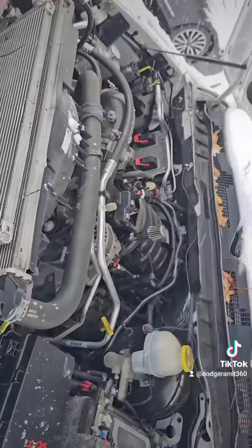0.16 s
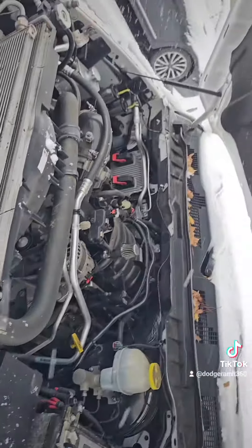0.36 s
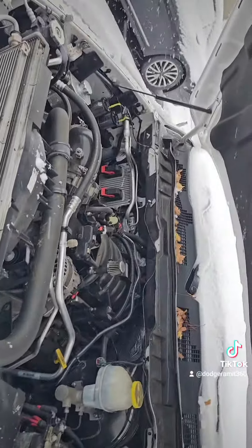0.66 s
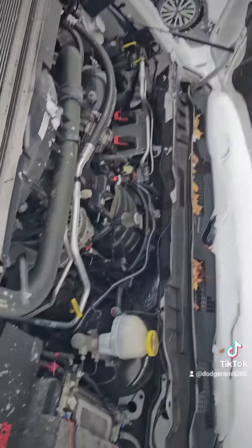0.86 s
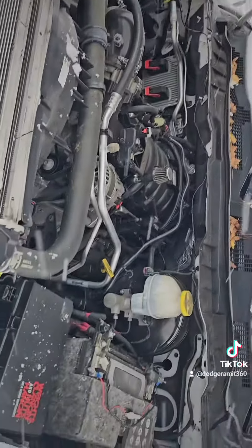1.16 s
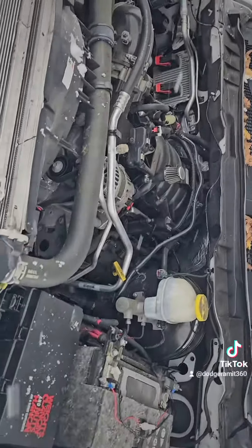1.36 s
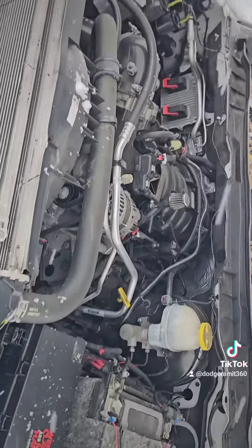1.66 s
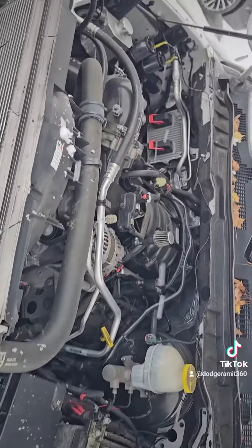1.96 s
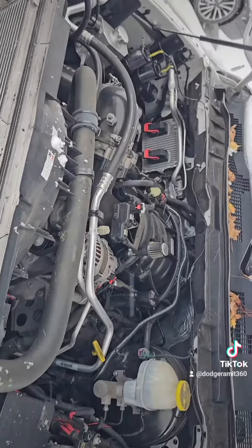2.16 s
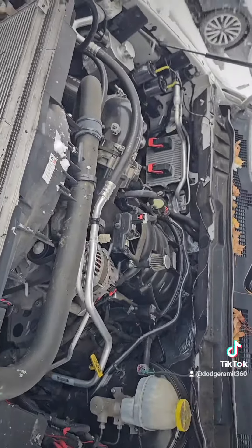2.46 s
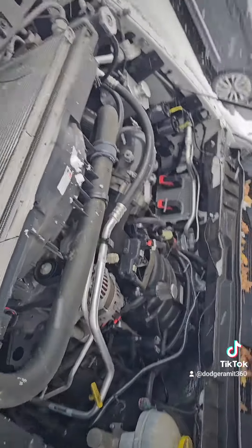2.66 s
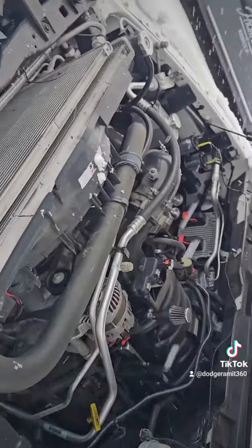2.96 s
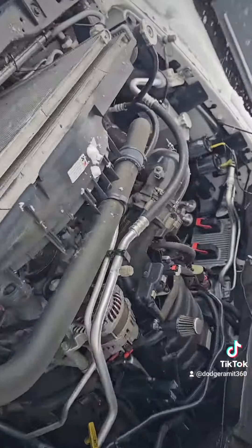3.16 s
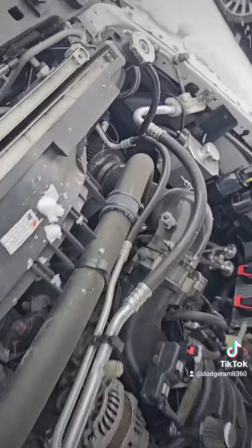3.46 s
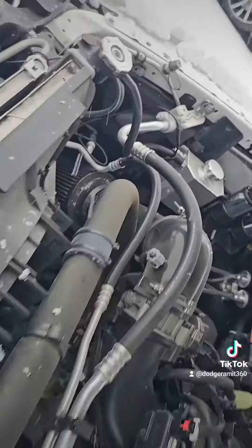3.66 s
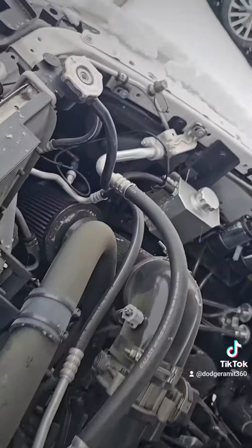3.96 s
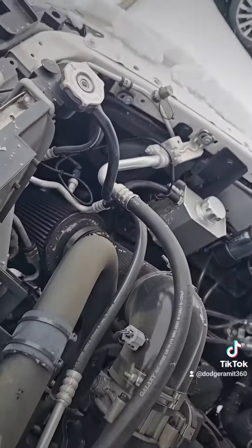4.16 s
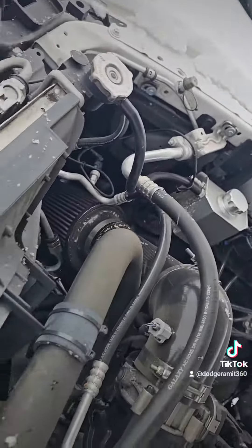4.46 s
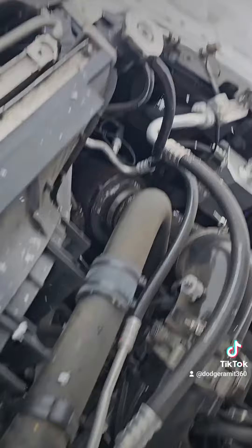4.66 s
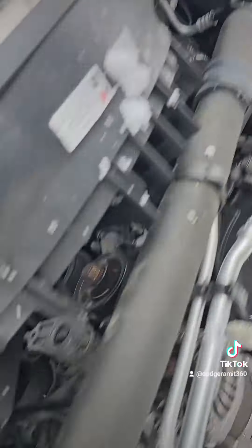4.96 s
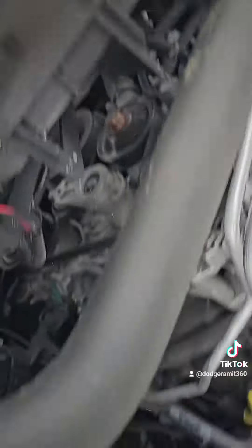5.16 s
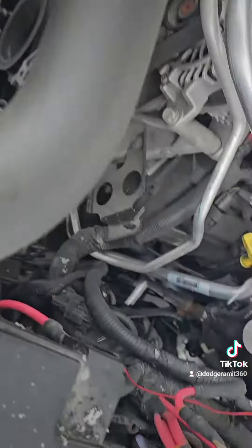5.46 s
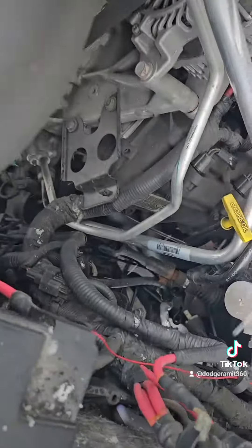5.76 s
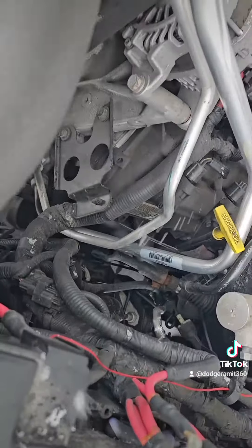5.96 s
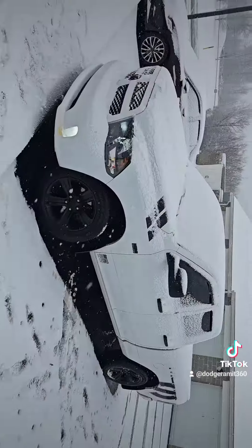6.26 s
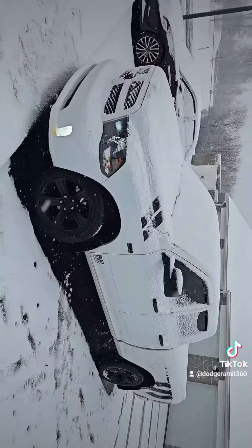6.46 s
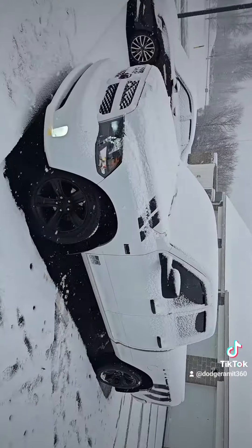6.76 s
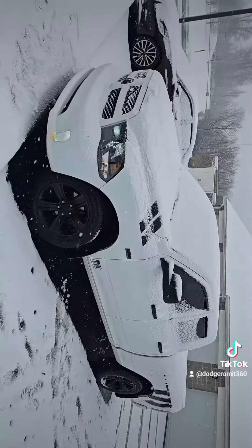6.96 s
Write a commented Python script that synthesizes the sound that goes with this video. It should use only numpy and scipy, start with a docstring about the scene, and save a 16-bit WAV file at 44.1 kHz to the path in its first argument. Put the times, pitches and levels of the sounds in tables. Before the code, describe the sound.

Close over an engine bay, a cold V8 throbs unevenly with ticking, hiss and wind bumps; after a short silence it sounds darker from outside.

```python
"""Over the open engine bay of a V8 pickup, cold and at fast idle on an open exhaust; a phone listens, then is lowered.
Eight evenly spaced firings send unequal blasts down unequal headers, ringing the exhaust resonances in a lope.
Gas hisses, the valve train clatters, a lifter clacks, injectors tick, accessories whine, wind nudges the microphone.
After a short silent break the same idle is heard from beside the truck, with the clatter and hiss dulled."""
import sys
import numpy as np
from scipy import signal
from scipy.fft import rfft, irfft
from scipy.io import wavfile
from scipy.ndimage import uniform_filter1d

SR = 44100
rng = np.random.default_rng(int(sys.argv[2]) if len(sys.argv) > 2 else 0)


def master_out(mix):
    """Clip the mix to full scale and print it as 16-bit PCM to the path in sys.argv[1]."""
    frames = np.transpose(np.atleast_2d(mix))
    ceiling = np.clip(frames, -1, 1)
    pcm = np.round(ceiling * 32767).astype(np.int16)
    wavfile.write(sys.argv[1], SR, pcm)


N = 313551
TIME = np.arange(N) / SR
FREQ = np.maximum(np.fft.rfftfreq(N, 1 / SR), 1)

# cylinders in firing order: (delay down the header [ms], relative exhaust blast [dB], relative hiss [dB])
CYLINDERS = [(-1.5, -4.2, -4.5), (-1.2, -2.9, -1), (-.1, 2.4, 1), (4.9, -2.2, -4), (-.7, -2.5, -.5),
             (-.4, -3.8, -4.5), (1.8, -.9, -3), (-1.5, 3.7, 1)]
# engine bay level as the microphone comes nearer, before each source's own trim: (time [s], level [dB])
BAY = [(0.4, -44.5), (1.33, -42.5), (3.06, -42.5), (3.42, -40.5), (4.33, -41), (6.0, -39), (6.05, -39)]
# the silence between the two listening places: (start [s], end [s])
BREAK_START_S, BREAK_END_S = (6.188, 6.285)


def undb(db):
    """Decibels to gain."""
    return 10 ** (np.asarray(db) / 20)


def curve(rows, column=1):
    """One column of a time table at every sample."""
    rows = np.array(rows)
    return np.interp(TIME, rows[:, 0], rows[:, column])


def over_freq(points):
    """A table of (frequency [Hz], value) at every frequency, straight over log frequency."""
    hz, value = np.transpose(points)
    return np.interp(np.log(FREQ), np.log(hz), value)


def unit(x):
    """Scale to a standard deviation of 1."""
    return x / np.std(x)


def noise():
    """White noise."""
    return rng.standard_normal(N)


def colour(x, points):
    """Give x a spectrum that falls 60 dB per octave further past the table's ends; rms 1."""
    octaves_below = np.log2(points[0][0] / FREQ)
    octaves_above = np.log2(FREQ / points[-1][0])
    octaves_out = np.maximum(0, np.maximum(octaves_below, octaves_above))
    gain = undb(over_freq(points) - 60 * octaves_out)
    return unit(irfft(rfft(x) * gain, N))


def resonance(hz, width_hz):
    """Response of one damped mode, gain 1 at its centre."""
    s = 1j * FREQ
    return s * width_hz / (s * s + s * width_hz + hz * hz)


def walk(rate_hz):
    """Straight lines between random normal values of spread 1, rate_hz of them a second."""
    steps = rng.standard_normal(4096)
    return np.interp(TIME * rate_hz, np.arange(len(steps)), steps)


def swell(centre_s, spread_s):
    """A Gaussian rise and fall with a peak of 1; spread_s is its standard deviation."""
    return np.exp(-.5 * ((TIME - centre_s) / spread_s) ** 2)


def impulses(times, sizes):
    """One impulse at each time."""
    return np.bincount(np.clip(times * SR, 0, N - 1).astype(int), sizes, N)


def crank(idle_rpm=824.82, sag_from_s=2.63, sag_rpm_per_s=2.1, second_start=.3425):
    """Four-stroke cycles so far, two turns each; the fast idle holds, then sinks as the engine warms."""
    # brief surges of the idle: (time [s], spread [s], extra speed [rpm])
    surges = [(1.908, .24, 5.94), (3.502, .196, 9.81)]
    rpm = idle_rpm - sag_rpm_per_s * np.maximum(TIME - sag_from_s, 0)
    for at_s, spread_s, extra_rpm in surges:
        rpm = rpm + extra_rpm * swell(at_s, spread_s)
    cycles = np.cumsum(rpm) / SR / 120
    # after the break the engine is at another point of its cycle
    through_break = np.clip((TIME - BREAK_START_S) / (BREAK_END_S - BREAK_START_S), 0, 1)
    return cycles - second_start * through_break


def firings(cycle, first=0.0698):
    """Time of every firing and its place in the firing order; eight evenly spaced in each cycle."""
    number = np.arange(int((cycle[-1] - first) * len(CYLINDERS)) + 1)
    times = np.interp(number / len(CYLINDERS) + first, cycle, TIME)
    return times, number % len(CYLINDERS)


def exhaust(cycle, close, beside, blast_db=36.0, low_cut_hz=40, soft_hz=430):
    """Unequal blasts, delayed unequally by the headers, ring the pipes; each listening place has its own mix."""
    # exhaust resonances, some in close pairs from the two banks: (frequency [Hz], width [Hz],
    # level over the bay [dB], level at the engine [dB], level beside the truck [dB], polarity [+1 or -1])
    pipes = [(49.8, 18.4, -9, -9.5, -17.5, -1), (69.8, 3.56, -4, -0.5, -7.5, -1),
             (100, 21.3, -2.5, 2.4, -16.5, -1), (111.73, 16.15, 2.5, 5, -11, 1),
             (139.4, 2.33, -4.5, -8.5, -22, 1), (151.8, 11.5, -46, -9, -6.5, 1),
             (186, 12.47, 7, 2.5, 1, -1), (189.7, 18.7, 2.3, -2.5, -4.5, 1),
             (233.9, 5.5, -10.5, -30, -20, -1), (254.2, 11.7, -21.5, -28.5, -16.5, -1),
             (296.8, 7.7, -13.5, -19.5, -24.5, 1), (343, 46, -35.5, -43.5, -31.5, 1)]
    # turbulence in the pipes: (frequency [Hz], relative level [dB per Hz])
    churn = [(40, -19), (70, 7), (200, 5), (290, 2), (400, -7.5), (600, -24)]
    scatter_db, jitter_ms, churn_db = .7, .12, -42
    times, cylinder = firings(cycle)
    delay_ms, size_db, _ = np.array(CYLINDERS)[cylinder].T
    time_chance, size_chance = rng.standard_normal((len(times), 2)).T
    arrival = times + (delay_ms + jitter_ms * time_chance) / 1000
    blasts = impulses(arrival, undb(blast_db + size_db + scatter_db * size_chance))
    # an open pipe radiates almost nothing of the slowest pulsation
    low_cut = signal.butter(4, low_cut_hz, "high", fs=SR, output="sos")
    blasts = rfft(signal.sosfilt(low_cut, blasts))
    # a blast lasts about a millisecond, so it holds no treble
    blasts = blasts / (1 + (FREQ / soft_hz) ** 8)
    out = undb(churn_db) * colour(noise(), churn)
    for hz, width_hz, bay_db, engine_db, beside_db, polarity in pipes:
        in_bay = undb(bay_db) * (1 - close) + undb(engine_db) * close
        gain = np.where(beside, undb(beside_db), in_bay)
        out = out + np.sign(polarity) * gain * irfft(blasts * resonance(hz, width_hz), N)
    return out


def valve_train(cycle, tick_s=0.011, valve_db=1, scatter_db=2.5, whirr_db=0, count=16):
    """Each valve seats once a cycle with its own short rattle, over the whirr of belt and fan."""
    ticks, age = 0, TIME[:SR // 40]
    for valve in range(count):
        place = (valve + rng.uniform(-.5, .5)) / count
        times = np.interp(np.arange(cycle[-1]) + place, cycle, TIME, left=-1, right=-1)
        times = times[times > 0]
        chance_db = scatter_db * rng.standard_normal(len(times))
        sizes = undb(valve_db * rng.standard_normal() + chance_db)
        rattle = rng.standard_normal(len(age)) * np.exp(-age / tick_s)
        ticks = ticks + signal.oaconvolve(impulses(times, sizes), rattle)[:N]
    return unit(ticks) + undb(whirr_db) * noise()


def lifter(cycle, place=0.5, ring_hz=1600, width_hz=900, db=-11):
    """One noisy lifter clacks once a cycle: a burst of noise rings a broad mode."""
    spread_cycles = .05
    gate = np.exp(-.5 * ((cycle % 1 - place) / spread_cycles) ** 2)
    clack = irfft(rfft(gate * noise()) * resonance(ring_hz, width_hz), N)
    return unit(clack) * undb(curve(BAY) + db)


def injectors(cycle, ring_hz=4240, width_hz=170, upper_hz=5300, upper_db=-6, lag_s=0.00076, db=-9.0):
    """A tick at every firing rings two short metal modes."""
    scatter_db, bounce_s = 1.2, .008
    times, _ = firings(cycle)
    sizes = undb(scatter_db * rng.standard_normal(len(times)))
    modes = resonance(ring_hz, width_hz) + undb(upper_db) * resonance(upper_hz, width_hz)
    # the needle bounces for a moment, differently each time
    window = np.hanning(int(bounce_s * SR))
    bounce = signal.fftconvolve(impulses(times + lag_s, sizes), window)[:N] * noise()
    return unit(irfft(rfft(bounce) * modes, N)) * undb(curve(BAY) + db)


def machinery(cycle, close, beside, above_db=-0.9, close_db=-0.88, beside_db=-49.5):
    """The clatter coloured by block and bay, with lifter and injectors; from beside, the body dulls it."""
    # clatter from above, close by and beside the truck: (frequency [Hz], relative level [dB per Hz])
    block_above = [(190, -47), (330, 5), (351, 0.5), (376, -6), (412, -23.5), (438, -17), (480, -11),
                   (726, -11), (854, -9.5), (1170, -9), (1770, -12), (1940, -7.5), (2870, -8.5),
                   (3280, -15.5), (3700, -12.5), (4810, -29), (8140, -120)]
    block_close = [(190, -38), (330, -2.5), (376, -12.5), (408, -8), (553, -3), (650, -5.5), (795, -4.5),
                   (1280, -10), (1960, -8), (2210, -10), (2400, -5), (2790, -9.5), (3700, -11.5),
                   (4810, -42), (8140, -120)]
    past_body = [(380, -1), (520, -10.5), (680, -9), (900, -9.5), (1500, -11.5), (2500, -12.5), (3300, -20),
                 (5200, -17.5), (6200, -25.5), (8400, -27), (10000, -44)]
    clatter = valve_train(cycle)
    from_above = (1 - close) * undb(above_db) * colour(clatter, block_above)
    from_close = close * undb(close_db) * colour(clatter, block_close)
    in_bay = undb(curve(BAY)) * (from_above + from_close) + lifter(cycle) + injectors(cycle)
    return np.where(beside, undb(beside_db) * colour(clatter, past_body), in_bay)


def puffs(cycle, lead_s=0.0027, rise_s=0.0029):
    """Gas flow that swells, spits and dies once a firing, each cylinder with its own strength; rms 1."""
    scatter_db, spit_db = .8, 2.1
    times, cylinder = firings(cycle)
    sizes = undb(np.array(CYLINDERS)[cylinder, 2] + scatter_db * rng.standard_normal(len(times)))
    age = TIME[:SR // 20] / rise_s
    flow = signal.fftconvolve(impulses(times - lead_s, sizes), age ** 2 * np.exp(-age))[:N]
    flow = flow * undb(spit_db * walk(450))
    return flow / np.sqrt(np.mean(flow ** 2))


def gas(flow, beside, hiss_steady=1.1, sizzle_steady=0.29, hiss_db=-2, sizzle_db=1.86, shielded_db=-25):
    """Hiss and sizzle follow the puffs; the highest band pulses most deeply; the body shields both from the side."""
    # gas hiss and its top sizzle: (frequency [Hz], relative level [dB per Hz])
    hiss_spectrum = [(2000, -28), (3400, -10.5), (4240, 2.5), (4730, -3), (5400, -3), (6190, -7),
                     (8060, -7), (8410, -8), (9160, -18.5), (10500, -29.5), (13600, -62), (22000, -120)]
    sizzle_spectrum = [(6060, -56), (10300, -36.5), (10800, -16), (12600, 1), (13900, 4), (15100, 2),
                       (16000, -18)]
    # sizzle level before its trim: (time [s], level [dB])
    sizzle_level = [(0.4, -52), (1.78, -49.5), (3.04, -48.5), (3.41, -43.5), (4.11, -47.5), (4.87, -45),
                    (5.96, -49), (6.05, -48.5)]
    hiss = colour(noise() * (hiss_steady + flow), hiss_spectrum) * undb(curve(BAY) + hiss_db)
    sizzle = colour(noise() * (sizzle_steady + flow), sizzle_spectrum)
    sizzle = sizzle * undb(curve(sizzle_level) + sizzle_db)
    return (hiss + sizzle) * undb(shielded_db * beside)


def passing_bands(rows, drive, fade_s=0.078):
    """Resonant bands, each fed by noise times the drive, that fade in and out."""
    out = 0
    for hz, width_hz, db, start, end in rows:
        heard = np.clip(np.minimum(TIME - start, end - TIME) / fade_s + .5, 0, 1)
        # two passes, each twice the listed width
        band = irfft(rfft(drive * noise()) * resonance(hz, 2 * width_hz) ** 2, N)
        out = out + undb(db) * heard * unit(band)
    return out


def whines(flow, rasp_steady=1.9):
    """Narrow wavering tones of the accessories come and go; the broader rasps pulse with the firings."""
    # accessory whines, then rasps that open up as the microphone moves past:
    # (frequency [Hz], nominal width [Hz], level [dB], start [s], end [s])
    whine_bands = [(835, 50, -57, 0, 3.3), (1000, 4, -63, 1.9, 6.2), (2000, 5, -56, 2.15, 2.8),
                   (2000, 6, -58, 3.3, 4.6), (3788, 30, -53, 5.6, 6.2), (680, 35, -59, 6.25, 7.2),
                   (2135, 30, -58, 6.55, 7.2)]
    rasp_bands = [(7460, 840, -50, 3.3, 3.7), (5110, 520, -48, 3.3, 6.2), (2580, 460, -44.5, 4.65, 5),
                  (7600, 660, -49.5, 5.05, 6.15), (2440, 470, -55.5, 6.35, 6.8)]
    return passing_bands(whine_bands, 1) + passing_bands(rasp_bands, rasp_steady + flow)


def buffets(breeze_db=-45.5, flutter_db=5.25, pop_noise_db=-9):
    """Wind rumbles on the microphone, with a few dull pops: a short low ring and a puff of noise."""
    # wind on the microphone, and a dull pop: (frequency [Hz], relative level [dB per Hz])
    wind_spectrum = [(15, -30.5), (35, -7), (50, -3.5), (100, -3.5), (250, -11.5), (500, -29.5),
                     (1000, -39)]
    pop_spectrum = [(100, -30), (320, 3), (500, -3), (900, -5), (1400, -25.5), (3000, -43)]
    # gusts over a light breeze, before flutter: (time [s], spread [s], level [dB])
    gusts = [(.1, .18, -30.5), (.58, .08, -32), (.79, .04, -33), (1.58, .12, -38), (2.52, .05, -41),
             (3.55, .09, -39), (5.85, .12, -43), (7.05, .22, -38)]
    # dull pops: (time [s], level [dB], pitch [Hz], decay [s])
    pops = [(.196, -30, 440, .003), (.460, -29, 420, .003), (.516, -30, 350, .006), (.531, -27, 420, .003),
            (.550, -26.5, 400, .005), (.764, -29, 340, .007), (.770, -25, 440, .003),
            (1.542, -32, 420, .005), (2.691, -17, 680, .001), (2.6935, -24, 480, .002)]
    wind = undb(breeze_db)
    for at_s, spread_s, db in gusts:
        wind = wind + undb(db) * swell(at_s, spread_s)
    out = colour(noise(), wind_spectrum) * wind * undb(flutter_db * walk(25))
    puff = undb(pop_noise_db) * colour(noise(), pop_spectrum)
    for start, db, hz, decay_s in pops:
        age = np.maximum(TIME - start, 0)
        ring = np.sqrt(2) * np.sin(2 * np.pi * hz * age)
        out = out + undb(db) * (TIME > start) * np.exp(-age / decay_s) * (ring + puff)
    return out


def ports(x):
    """The two microphone ports colour the sound a little differently."""
    # (frequency [Hz], left minus right [dB])
    balance = [(170, 0), (255, 2), (340, 0), (1300, 0), (1430, 3), (2600, 3), (2850, 0), (6100, -.3),
               (7000, 7), (8400, 9), (9900, -1), (11000, -17), (13000, -10), (15500, -6)]
    # (frequency [Hz], lead of the left port [rad])
    phase = [(55, 0), (115, -.15), (165, .2), (215, .27), (265, -.2), (310, -.2), (390, 0)]
    half = np.array([[.5], [-.5]])
    gain = undb(half * over_freq(balance))
    gain = gain / gain.mean(axis=0)
    return irfft(rfft(x) * gain * np.exp(1j * half * over_freq(phase)), N)


def scene(diffuse_db=-14.0):
    """One crank drives the engine; part of the hiss is scattered by the bay and differs between the ports."""
    # microphone place: (time [s], nearness [0 over the bay, 1 down at the engine])
    nearness = [(0, 0.025), (2.9, 0.076), (3.3, 0.12), (3.8, 1.01), (4.9, 1.1), (5.3, 0.67), (6.2, 0.87)]
    cycle, close = crank(), curve(nearness)
    beside = TIME > (BREAK_START_S + BREAK_END_S) / 2
    flow = puffs(cycle)
    direct = exhaust(cycle, close, beside) + machinery(cycle, close, beside)
    direct = direct + gas(flow, beside) + whines(flow) + buffets()
    # short waves scatter most
    short_waves = signal.butter(2, 6000, "high", fs=SR, output="sos")
    scattered = signal.sosfilt(short_waves, gas(flow, beside))
    return ports(direct + undb(diffuse_db) * np.array([[1], [-1]]) * scattered)


def record(dry, edge_s=0.00098, top_hz=15850):
    """Silence between the two places, soft ends, and a steep cut at the top."""
    running = 1. * ((TIME < BREAK_START_S) | (TIME > BREAK_END_S))
    running = uniform_filter1d(running, size=40)
    running = running * np.clip(np.minimum(TIME, TIME[-1] - TIME) / edge_s, 0, 1) ** 2
    top_cut = signal.ellip(10, .2, 80, top_hz, fs=SR, output="sos")
    return signal.sosfilt(top_cut, dry * running)


dry = scene()
out = record(dry)
master_out(out)
```